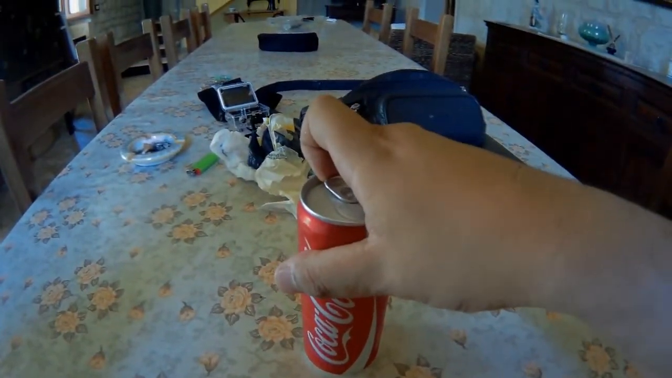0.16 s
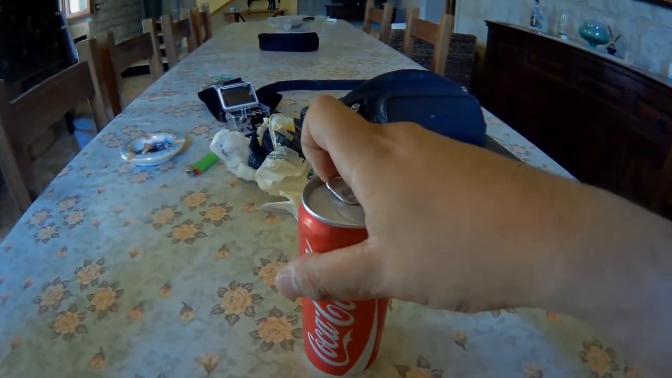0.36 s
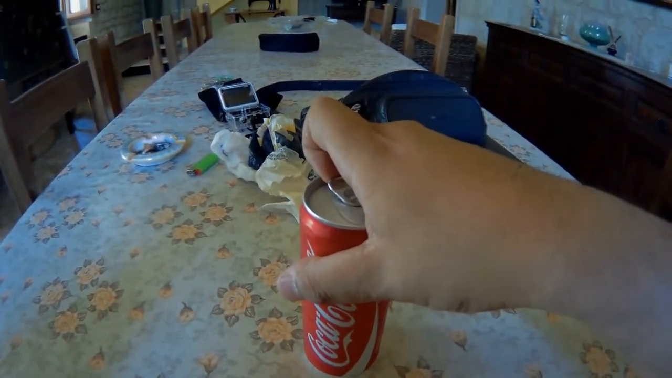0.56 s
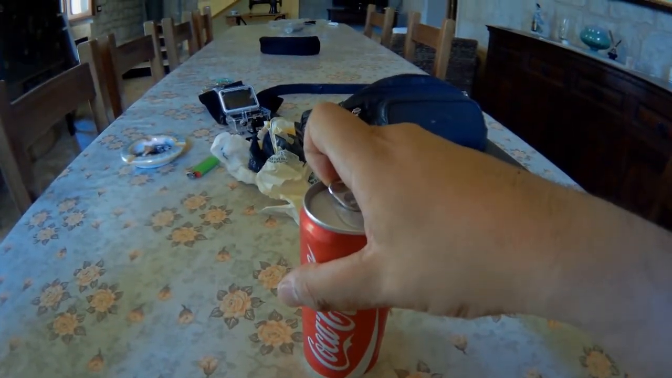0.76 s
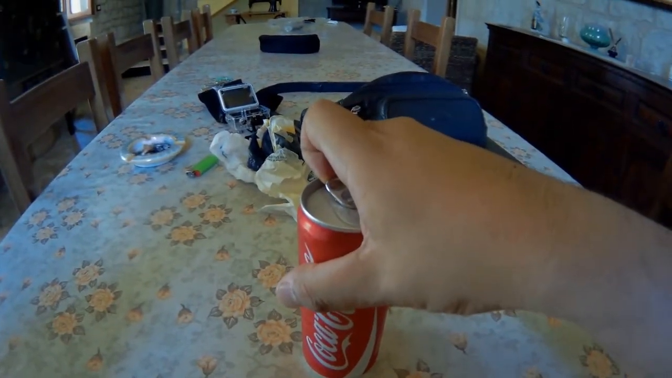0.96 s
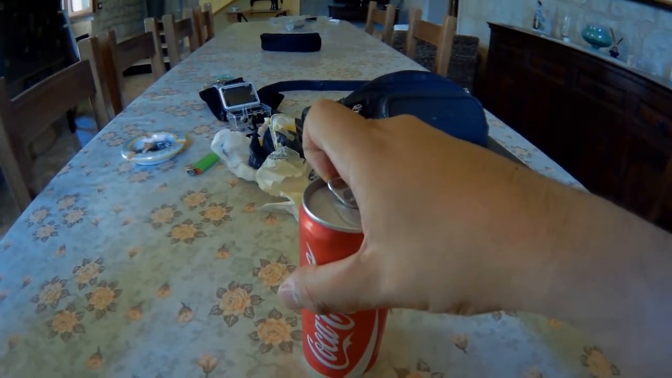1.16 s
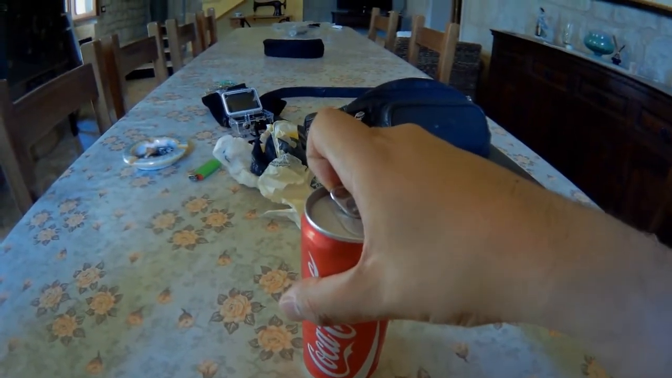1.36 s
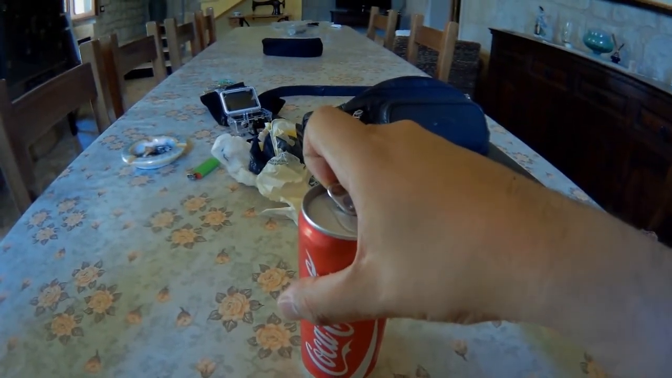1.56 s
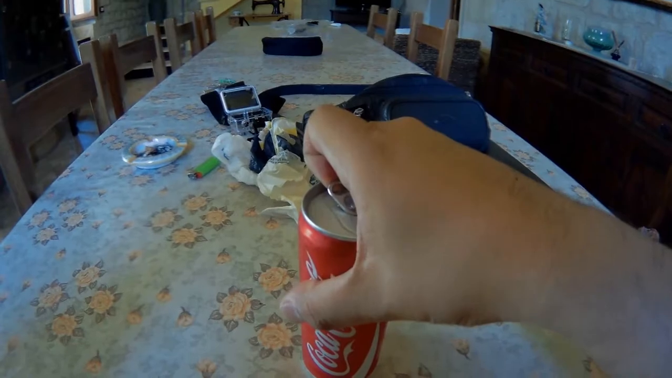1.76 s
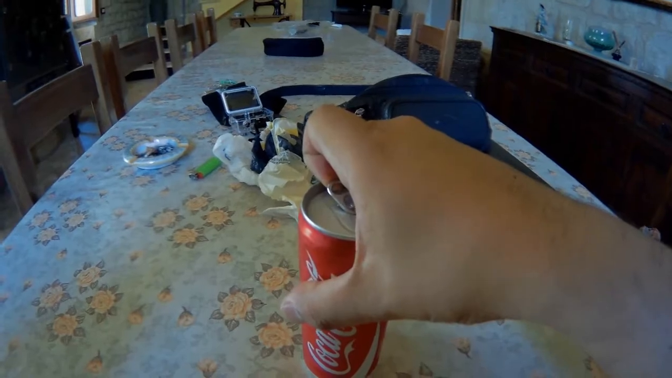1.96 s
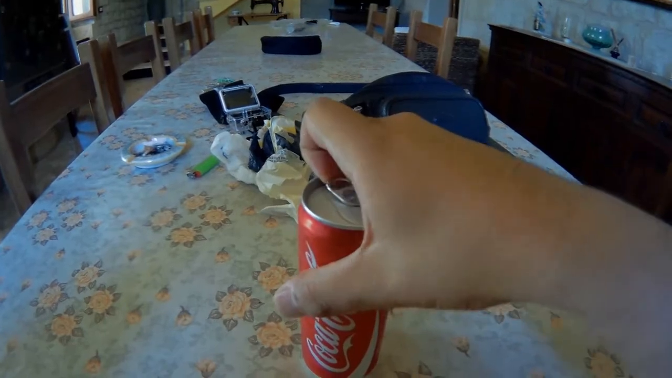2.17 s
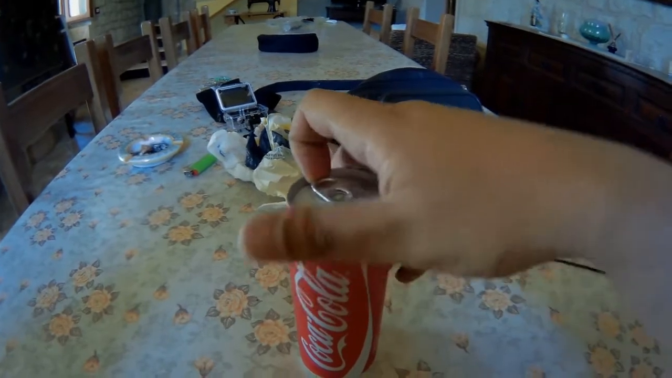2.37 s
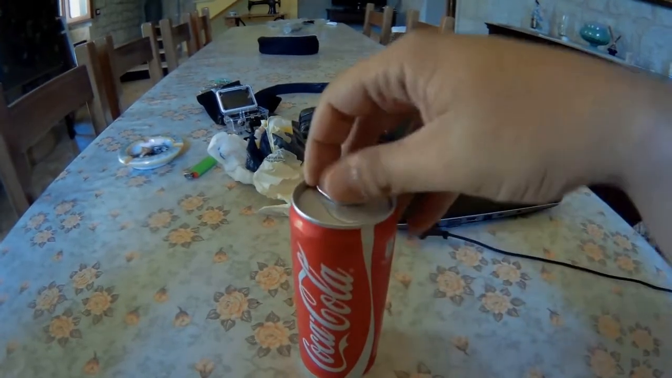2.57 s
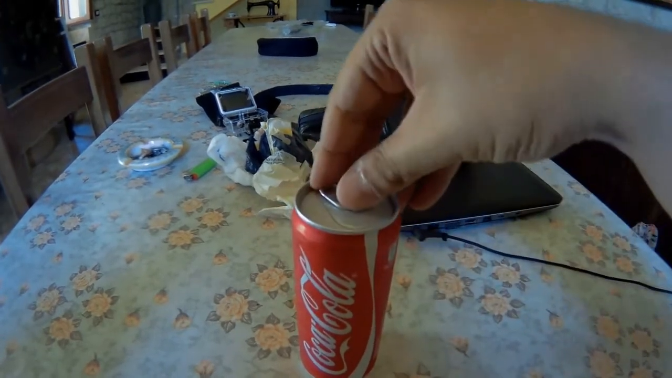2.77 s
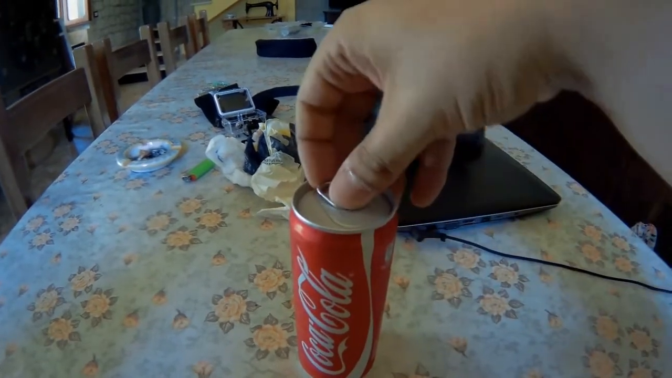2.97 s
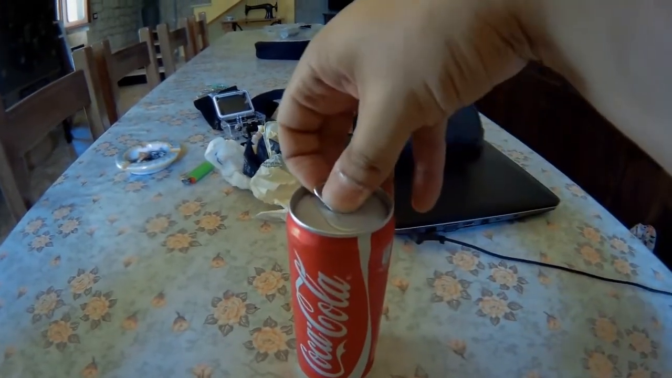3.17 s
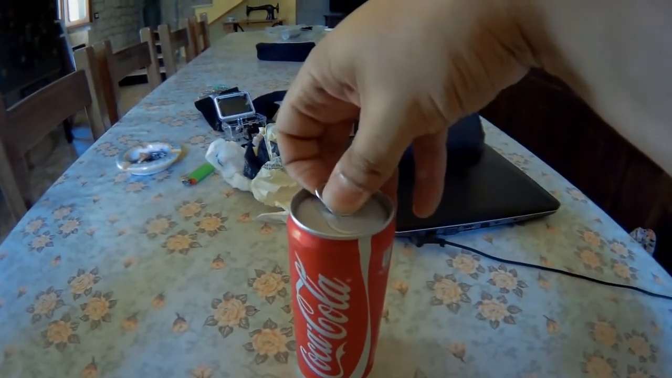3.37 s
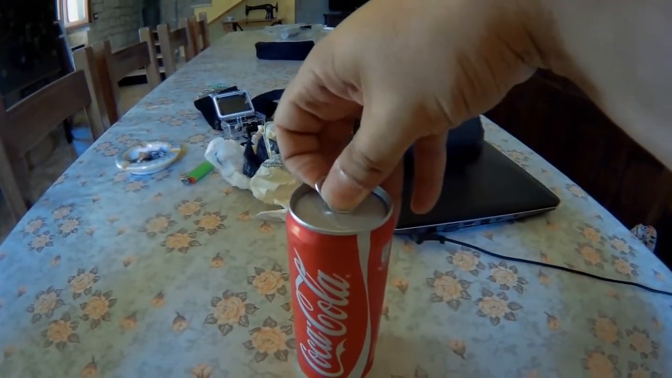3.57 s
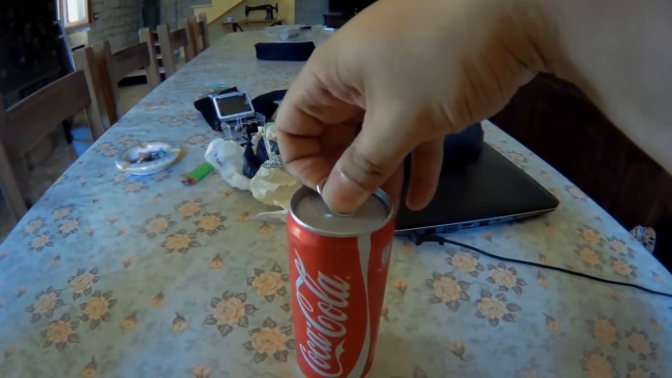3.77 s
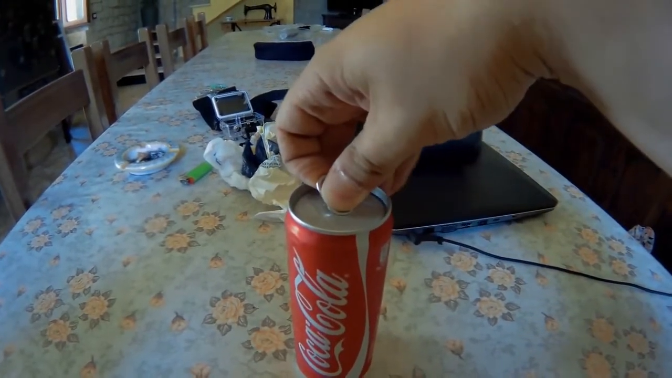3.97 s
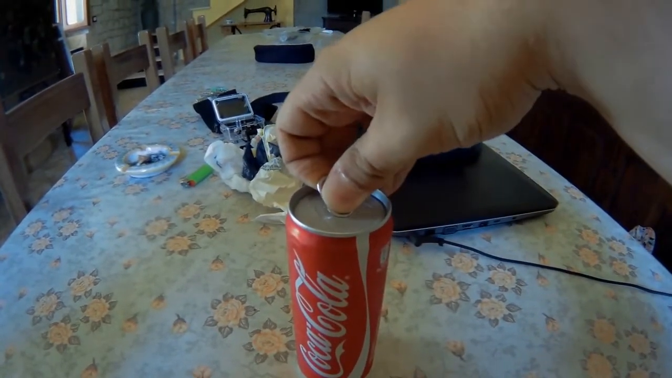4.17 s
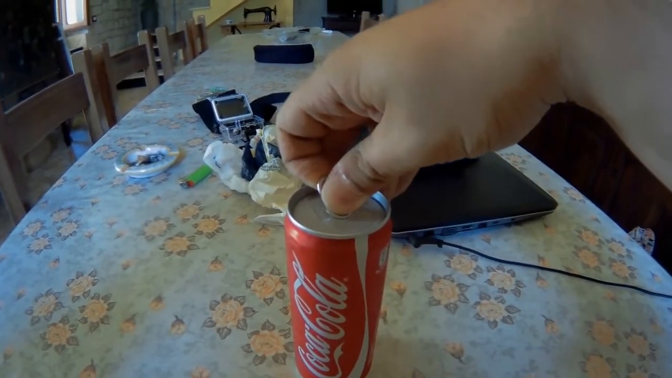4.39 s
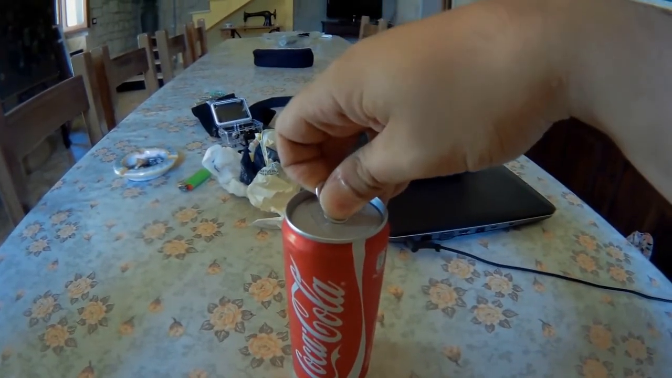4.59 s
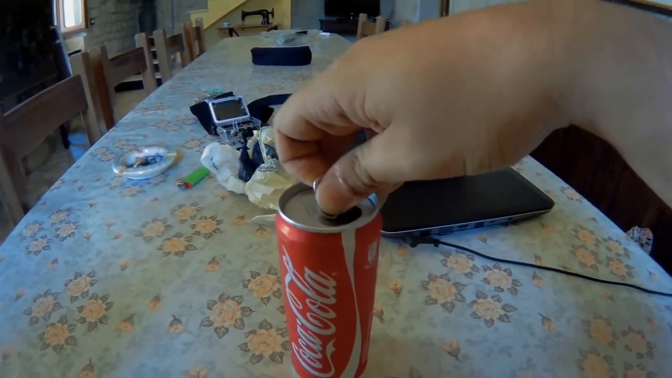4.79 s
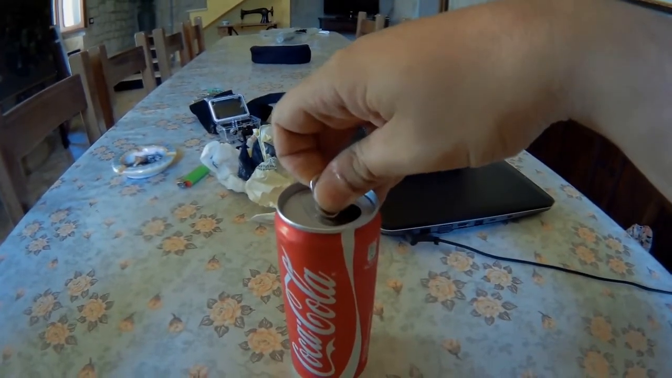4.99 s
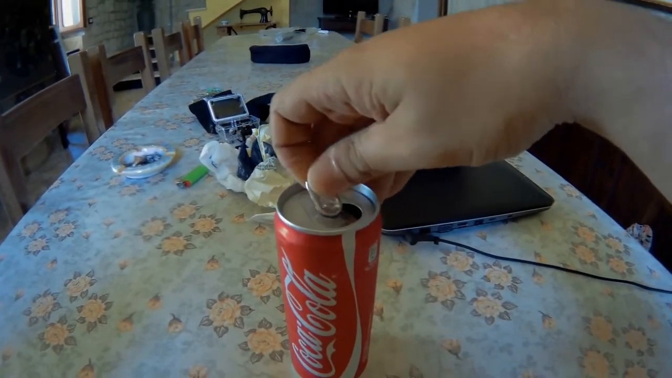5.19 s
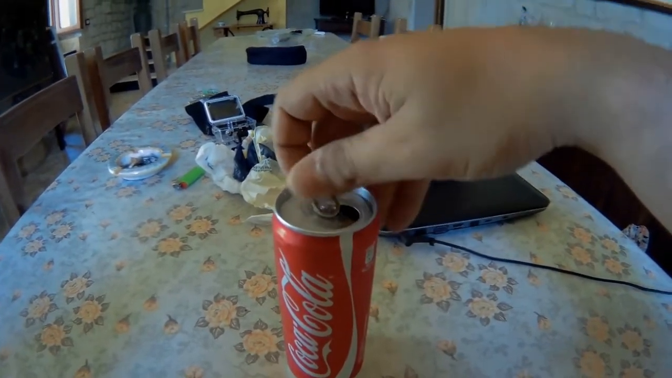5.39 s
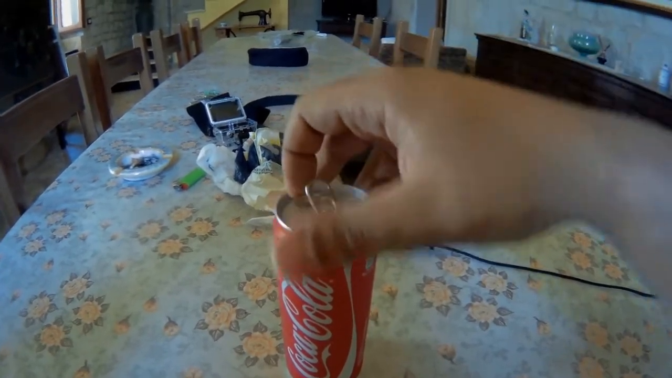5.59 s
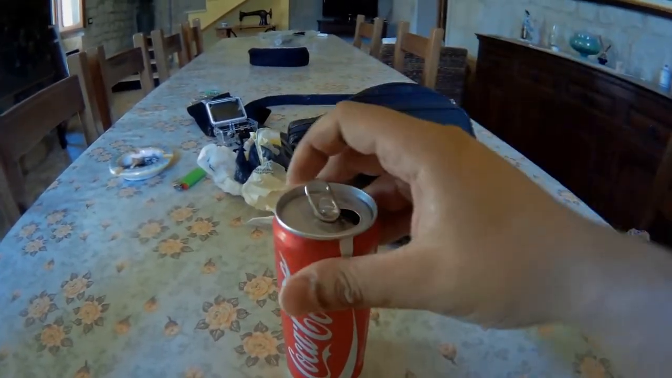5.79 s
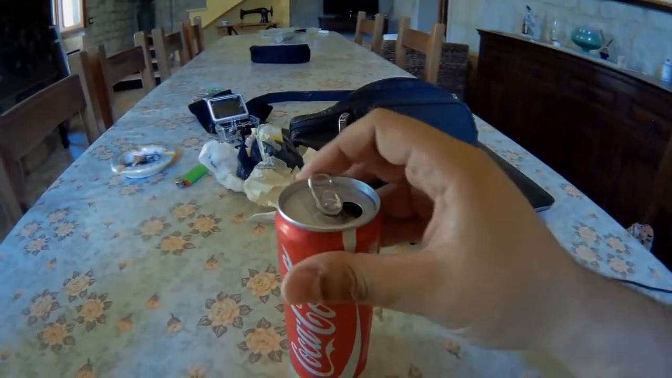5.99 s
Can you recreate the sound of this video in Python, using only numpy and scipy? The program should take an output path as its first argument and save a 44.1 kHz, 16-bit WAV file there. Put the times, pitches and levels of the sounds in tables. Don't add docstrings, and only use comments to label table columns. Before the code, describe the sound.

A drink can's tab cracks with a brief gas hiss and sharp pop, then its lid folds in with a loud hollow clack in a quiet room.

```python
import sys
import numpy as np
from scipy import signal
from scipy.fft import rfft, irfft, next_fast_len
from scipy.io import wavfile
from scipy.ndimage import uniform_filter1d, map_coordinates

SR = 44100
rng = np.random.default_rng(int(sys.argv[2]) if len(sys.argv) > 2 else 0)


def wav_out(sig):
    wavfile.write(sys.argv[1], SR, np.round(np.clip(np.atleast_2d(sig).T, -1, 1) * 32767).astype(np.int16))


def volts(x):
    e = np.asarray(x, float) / 20
    return 10 ** e


N = 266440

# pitch_hz, level_db (per Hz)
FLOOR_COLOUR = [(12, -31), (20, -2.5), (251, -4.5), (304, -5.5), (340, -6.5), (425, -7.5), (783, -11.5),
                (851, -12), (1480, -14.5), (3410, -25), (15300, -30.5)]
# pitch_hz, t60_s (time to fade by 60 dB)
ROOM_FADE = [(300, 1), (1200, 0.57), (4000, .55), (8000, 0.51), (15000, 0.49)]
# pitch_hz, level_db (per Hz)
FLOCK_COLOUR = [(3000, -25), (3700, 0), (4200, 0), (4900, -6.5), (5600, -3.5), (6200, -23)]
# pitch_hz, level_db
WINDOW = [(2500, -19), (3200, -10), (3800, -1), (4200, 1), (4600, 1), (5100, -2), (5700, 1), (6300, -19)]
# start_s, start_pitch_hz, level_db
NEAR_CHIRPS = [(.939, 5810, -57), (1.849, 5640, -59.5), (2.475, 4800, -61.5), (3.276, 5890, -61),
               (4.259, 4700, -59), (5.468, 5800, -58.5)]
# start_s, level_db
HIGH_CHIRPS = [(.126, -80), (0.407, -68.5), (2.444, -67.5), (3.02, -82.5), (5.878, -80.5)]
# start_s, level_db
LOW_CHIRPS = [(0, -76), (.15, -77), (0.423, -68.5), (0.829, -72), (1.547, -98), (2.16, -75), (2.991, -77)]
# start_s, peak_db, ring_hz, lid_share_db
NAIL_TICKS = [
    (0.9238, -44, 7700, -6),
    (0.923, -44, 5600, -12),
    (2.328, -56, 11000, 3),
    (2.328, -57, 5360, -6),
    (2.485, -58, 9000, -3),
    (2.485, -57, 6000, -9),
    (2.591, -53, 2150, -12),
    (2.591, -48, 1200, -12),
    (2.592, -50, 4400, -9),
]
# start_s, peak_db, ring_hz, lid_share_db
SEAL_SNAPS = [
    (3.4366, -34.5, 4946, -4),
    (3.471, -43, 4404, -2.5),
    (4.613, -37, 3800, -2.5),
    (4.6153, -27.5, 4996, -5.5),
    (4.636, -19.5, 4900, 1),
    (4.658, -37, 4600, -1.5),
    (4.668, -39.5, 4530, 4),
    (4.6825, -25.5, 4300, -11),
]
# start_s, peak_db, ring_hz, lid_share_db
LAST_TEARS = [(4.7458, -15, 4910, -4), (4.7470, -9, 4300, -4), (4.7488, -17, 3500, -7),
              (4.7614, -15, 4280, -5), (4.7686, -13, 4400, -6), (4.7692, -3, 4600, -9)]
# pitch_hz, width_hz, level_db
CLOSED_LID = [(1450, 280, 2), (2408, 350, 0.5), (3600, 700, 0.5), (5470, 900, -3.5), (7500, 290, -4.5),
              (12800, 2900, -21.5)]
# pitch_hz, width_hz, level_db
RIM_SHADE = [(1600, 600, 1), (2900, 600, -12.5), (6437, 800, -10), (7500, 730, 5)]
# pitch_hz, level_db (per Hz)
GAS_COLOUR = [(150, -56.5), (250, -24), (554, -24), (594, -35.5), (731, -16.5), (1010, -17), (1650, -15.5),
              (2770, -16), (2910, -33), (3230, -14.5), (4260, -5), (6570, -10), (10500, -12), (11800, -4.5),
              (15600, -18.5)]
# pitch_hz, width_hz, level_db
GAS_WHISTLES = [(1460, 300, 4.5), (2950, 380, -25.5), (4270, 300, 5.5), (5600, 120, 0), (7800, 300, 3),
                (9356, 480, 5.5), (12100, 700, 0.5), (15200, 800, 6.5)]
# pitch_hz, width_hz, level_db
RIVET_RINGS = [(344, 900, -30), (1413, 310, -15), (4283, 180, 4.5), (4600, 450, -2), (5220, 320, -8),
               (13800, 1600, -38)]
# pitch_hz, level_db (per Hz)
POP_COLOUR = [(240, -47.5), (400, -18.5), (663, -21.5), (1360, -12.5), (3070, -18), (4440, -0.5),
              (5420, -8), (6510, -20.5), (7950, -22.5), (15600, -44.5)]
# pitch_hz, width_hz, level_db
POP_ECHO_RINGS = [(4150, 180, 7), (5495, 270, 5), (7600, 300, 4.5)]
# start_s, peak_db, bright_share_db
FOLD_CLACKS = [
    (4.7716, -1, 1),
    (4.7733, -7, 6),
    (4.7746, -19, 16),
    (4.801, -20, 2),
]
# pitch_hz, width_hz, level_db
CAN_BODY = [(1193, 36, 0), (1234, 140, 10), (1428, 260, 12.5), (1880, 260, -7.5)]
# pitch_hz, width_hz, level_db
BENT_LID = [(2276, 320, 4), (3840, 410, 2), (3800, 150, 4), (5100, 1200, 0), (7250, 600, -17.5)]
# pitch_hz, level_db (per Hz)
FOLD_COLOUR = [(300, -42.5), (600, -31), (900, -20), (1120, -10.5), (1450, -10), (1930, -17), (2500, -10),
               (3500, -11), (4800, -20.5), (5500, -17.5), (6500, -29), (11000, -33), (15600, -45)]
# pitch_hz, width_hz, level_db
FOLD_ECHO_RINGS = [(1220, 36, 8), (1280, 21, 3), (2600, 90, 3), (3001, 67, 0.5), (3800, 140, 6),
                   (4300, 100, 4), (7200, 400, 7)]
# pitch_hz, level_db, t60_s
HOLLOW_TONES = [(1153, -21, 0.2), (1242, -20.5, .14)]
# start_s, peak_db, bright_share_db, length_s
FINGER_TOUCHES = [(5.176, -52, -18, .05), (5.186, -46, -18, 0.07), (5.23, -56, -10, .03),
                  (5.373, -55.5, -6, .015), (6.016, -55.5, 4, 0.014), (6.026, -49, -7, 0.018)]
# start_s, end_s
TREBLE_GAPS = [(.895, .915), (.93, .95), (3.42, 3.481), (3.614, 3.6345), (3.6385, 3.641), (4.605, 4.772),
               (4.775, 4.793)]
# start_s, end_s
HALF_GAP = (4.772, 4.775)

POP_S, FOLD_S = 3.6353, 4.7716


def along(points, hz):
    f, v = np.transpose(points)
    return np.interp(np.log(hz + 1), np.log(f + 1), v)


def filtered(x, response):
    m = next_fast_len(len(x) + SR // 2)
    return irfft(rfft(x, m) * response(np.fft.rfftfreq(m, 1 / SR)), m)[:len(x)]


def bumps(modes):
    def gain(f):
        return np.prod([1 + (volts(db) - 1) / (1 + (2 * (f - c) / w) ** 2) for c, w, db in modes], axis=0)
    return gain


def resonances(modes):
    def response(f):
        total = 0
        for k, (c, w, db) in enumerate(modes):
            total = total + (-1) ** k * volts(db) * 1j * f * w / (c * c - f * f + 1j * f * w)
        return total
    return response


def struck(modes, slip_s, ragged=0.54):
    t = np.arange(SR // 8) / SR
    kicks = ragged * rng.standard_normal(len(t)) * volts(-60 * t / slip_s)
    kicks[0] = 1
    ring = filtered(kicks, resonances(modes))
    return ring / np.abs(ring).max()


def noise(gain):
    x = filtered(rng.standard_normal(N), gain)
    return x / np.std(x)


def wobble(rate):
    knots = rng.standard_normal(int(N * rate / SR) + 4)
    return map_coordinates(knots, [np.arange(N) * rate / SR])


def add(track, s, x):
    part = track[round(s * SR):][:len(x)]
    part += x[:len(part)]


def bounced(x, lag_s, db):
    return x + volts(db) * np.roll(x, round(lag_s * SR))


def room(x, size=1):
    hz, t, z = signal.stft(rng.standard_normal(SR), SR, nperseg=128)
    fade = volts(-60 * t / (size * along(ROOM_FADE, hz)[:, None]))
    tail = signal.istft(z * fade, SR, nperseg=128)[1]
    return signal.fftconvolve(x, tail / np.linalg.norm(tail))[:N]


def spread(spectrum, rings):
    tail = filtered(room([1.]), lambda f: volts(along(spectrum, f)) * bumps(rings)(f))
    lumps = 1.4 * wobble(150)[:len(tail)]
    tail = tail * volts(lumps * np.exp(-np.arange(len(tail)) / (.08 * SR)))
    return tail / np.linalg.norm(tail)


def floor():
    def low_share(f):
        return 1 / (1 + (f / 1500) ** 4)
    low = noise(lambda f: volts(along(FLOOR_COLOUR, f)) * low_share(f))
    hiss = noise(lambda f: volts(along(FLOOR_COLOUR, f)) * (1 - low_share(f)))
    drift_db = 0.23 * wobble(2.5) + 0.27 * wobble(18)
    return volts(-62.5 + drift_db) * low + volts(-71.5) * hiss


def flock():
    colour = [(20, -120)] + FLOCK_COLOUR + [(20000, -120)]
    level_db = -81 + 1.6 * wobble(1.2) + 4.5 * wobble(8.1)
    return volts(level_db) * noise(lambda f: volts(along(colour, f)))


def sparrows():
    out, unsteady = np.zeros(N), wobble(300)
    last_hz = 3140
    chirps = [(s, db, 0.077 + 3e-5 * (hz - last_hz), hz, last_hz) for s, hz, db in NEAR_CHIRPS]
    chirps += [(s, db, 0.062, 5800, 5000) for s, db in HIGH_CHIRPS]  # length_s, start_hz, end_hz
    chirps += [(s, db, 0.1, 5100, 3680) for s, db in LOW_CHIRPS]
    for s, db, length_s, start_hz, end_hz in chirps:
        u = np.arange(round(length_s * SR)) / (length_s * SR)
        depth = .22 * (start_hz - end_hz) / start_hz + 0.02
        zigzag = depth * np.sin(2 * np.pi * (45 * length_s * u + rng.random()))
        zigzag = zigzag + .03 * unsteady[round(s * SR):][:len(u)]
        hz = (start_hz + (end_hz - start_hz) * u ** 0.42) * (1 + zigzag)
        swell = np.sin(np.pi * u ** 0.45) ** 0.81 * (0.49 + u)
        add(out, s, volts(db + 7.5) * swell * np.sin(2 * np.pi * np.cumsum(hz) / SR))
    return filtered(out, lambda f: volts(along(WINDOW, f)))


def snaps():
    out = np.zeros(N)
    # t60 0.0028 s, echo -24 dB, no shading by the rim
    hits = [(*row, 0.0028, -24, [(0, 1, 0)]) for row in NAIL_TICKS]
    for row in SEAL_SNAPS + LAST_TEARS:
        t60 = .004 + .001 * max(-3 - row[3], 0)
        hits.append((*row, t60, -10, RIM_SHADE))
    for s, db, tab_hz, lid_db, t60, room_db, shade in hits:
        width = np.log(1000) / (np.pi * max(t60, .002))
        tab_modes = [(tab_hz, width, 0), (tab_hz, 2.9 * width, -5), (.86 * tab_hz, 1.4 * width, -7)]
        tab = struck(tab_modes, slip_s=.002, ragged=0.47)
        lid = volts(lid_db) * struck(CLOSED_LID, slip_s=0.0043, ragged=0.21)
        near = filtered(volts(db) * (tab + lid), bumps(shade))
        around = filtered(volts(db) * (tab + 1.5 * lid), bumps(shade))
        add(out, s, bounced(near, lag_s=0.0026, db=-8.5))
        add(out, s + 0.0054, volts(room_db) * room(around))
    return out


def gas():
    jet = noise(lambda f: volts(along(GAS_COLOUR, f)) * bumps(GAS_WHISTLES)(f))
    t = np.maximum(np.arange(N) / SR - 3.4665, 0)
    after = np.maximum(np.arange(N) / SR - POP_S, 0)
    opening, emptying = 1 - np.exp(-t / .08), np.exp(-(t / .095) ** 0.85)
    last_puff = volts(-23.5 - 60 * after / 0.1284) * (after > 0)
    shut = np.exp(-after / .003) + last_puff
    sputter_db = 2.3 * wobble(150) + 1.2 * wobble(35)
    return opening * emptying * shut * volts(-15 + sputter_db) * jet


def gas_echo(jet):
    return volts(-8.5) * room(filtered(jet, lambda f: 1 / (1 + (f / 8500) ** 4)))


def pop():
    out = np.zeros(N)
    ring = struck(RIVET_RINGS, slip_s=.001, ragged=.1)
    add(out, POP_S, volts(4) * bounced(ring, lag_s=.0031, db=-10))
    out = bounced(out, lag_s=.0092, db=-18)
    add(out, POP_S + 0.0043, volts(4.5) * spread(POP_COLOUR, POP_ECHO_RINGS))
    return out


def clacks():
    out = np.zeros(N)
    for s, db, bright_db in FOLD_CLACKS:
        body = struck(CAN_BODY, slip_s=0.001)
        crack = volts(bright_db) * struck(BENT_LID, slip_s=0.003)
        add(out, s, volts(db) * (body + crack))
    add(out, FOLD_S + 0.0057, volts(15) * spread(FOLD_COLOUR, FOLD_ECHO_RINGS))
    return out


def hollow():
    out, t = np.zeros(N), np.arange(SR // 2) / SR
    ring = sum(volts(db - 60 * t / t60) * np.sin(2 * np.pi * hz * t) for hz, db, t60 in HOLLOW_TONES)
    add(out, FOLD_S, ring * (1 - np.exp(-t / .003)))
    return out


def push():
    out = np.zeros(N)
    u = np.arange(SR // 20) / (.0015 * SR)
    add(out, FOLD_S, volts(-41) * u * np.exp(1 - u))
    return out


def touches():
    out = np.zeros(N)
    for s, db, bright_db, length_s in FINGER_TOUCHES:
        body = struck(CAN_BODY, length_s, ragged=3)
        bright = volts(bright_db) * struck(BENT_LID, length_s, ragged=3)
        add(out, s, volts(db) * (body + bright))
    return out


def scene():
    birds, jet = sparrows(), gas()
    second = np.arange(N) // SR
    far = sum(room(birds * (second % 2 == k), size=.9) for k in range(2))
    can = snaps() + jet + gas_echo(jet) + pop() + clacks() + hollow() + push() + touches()
    return (floor() + flock() + far + can)[None]


def low_pass(x):
    return signal.sosfilt(signal.butter(12, 16620, fs=SR, output="sos"), x)


def record(dry):
    x = dry[0] / (1 + np.abs(dry[0] / .83) ** 8) ** (1 / 8)
    x = filtered(x, lambda f: f < 15680)
    t = np.arange(N) / SR
    dull = sum((t > a) & (t < b) for a, b in TREBLE_GAPS)
    dull = dull + .5 * (t > HALF_GAP[0]) * (t < HALF_GAP[1])
    dull = uniform_filter1d(dull, size=90)
    treble = filtered(x, lambda f: 1 / (1 + np.exp(np.clip((8700 - f) / 60, -50, 50))))
    return low_pass((x - dull * treble)[None])


dry = scene()
out = record(dry)
wav_out(out)
```